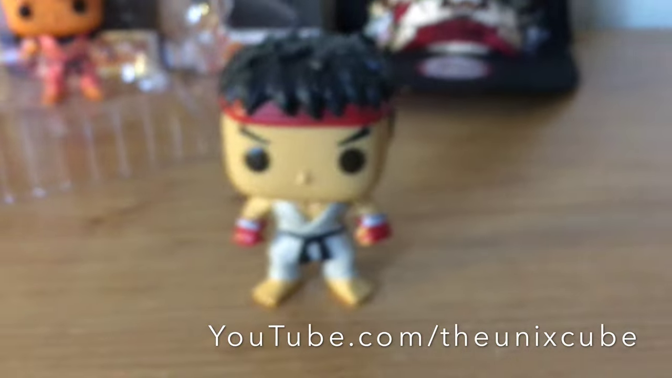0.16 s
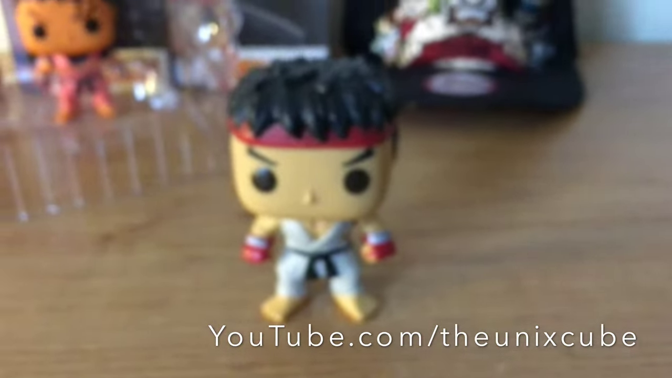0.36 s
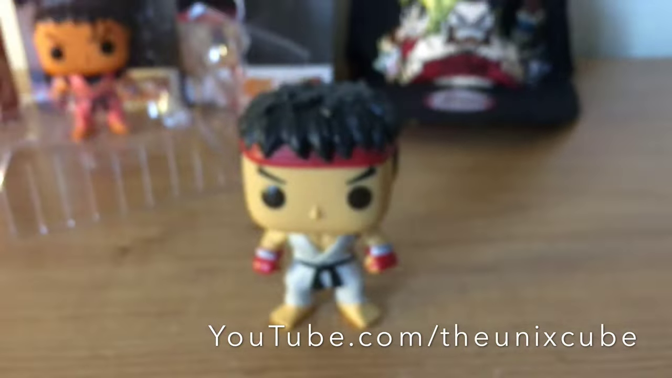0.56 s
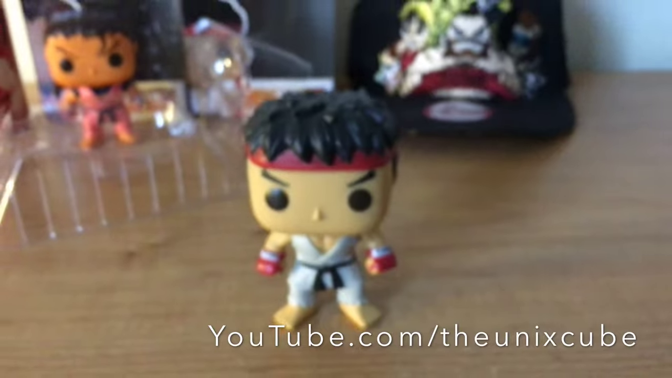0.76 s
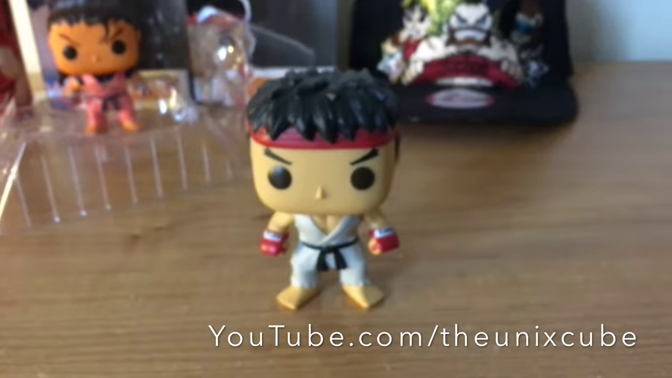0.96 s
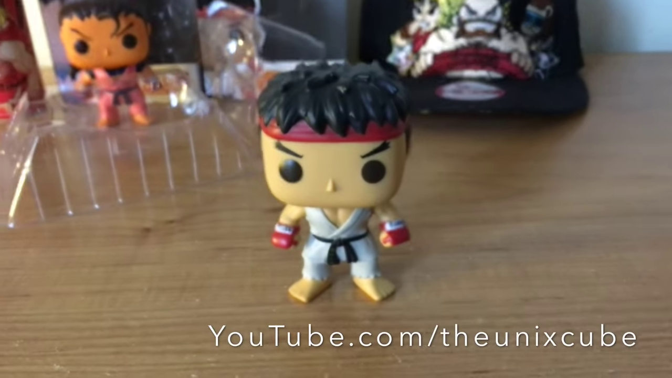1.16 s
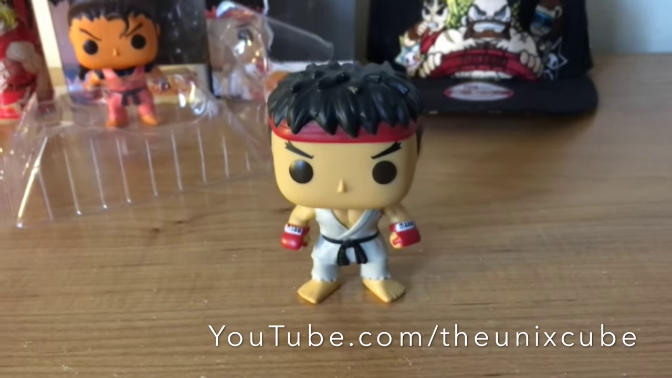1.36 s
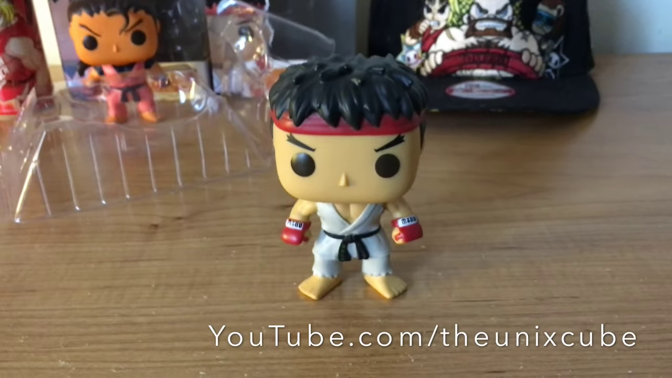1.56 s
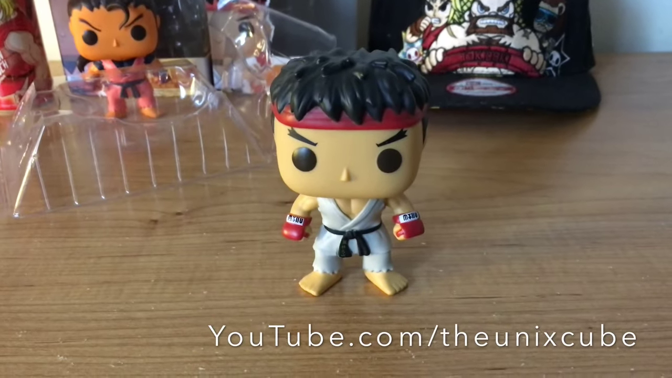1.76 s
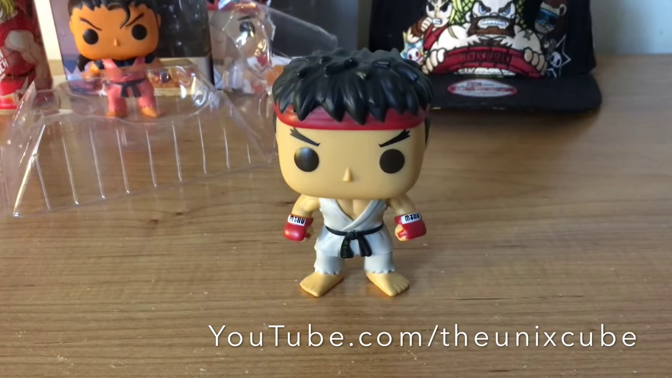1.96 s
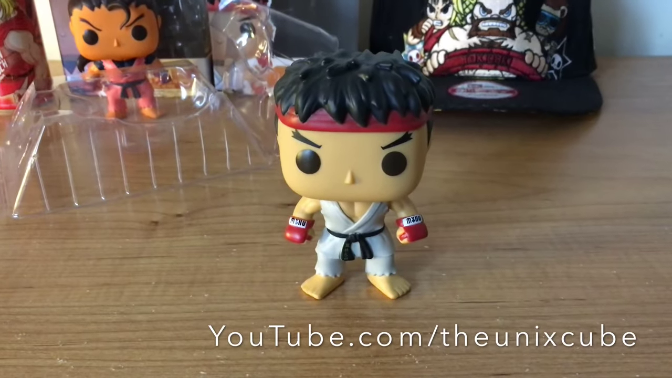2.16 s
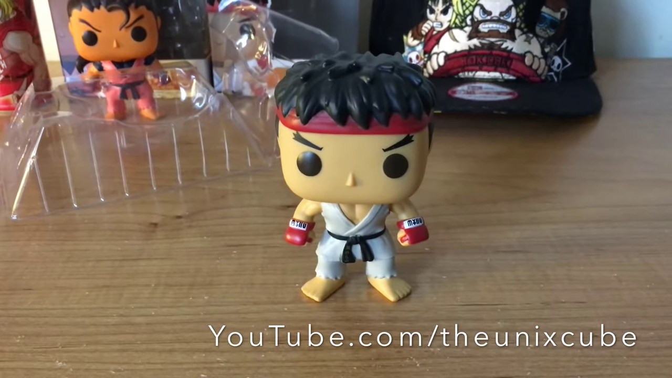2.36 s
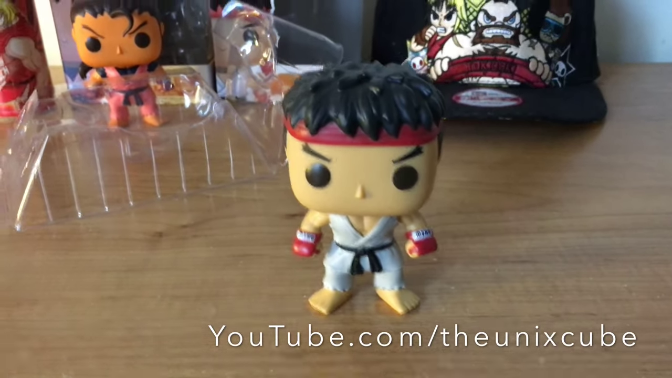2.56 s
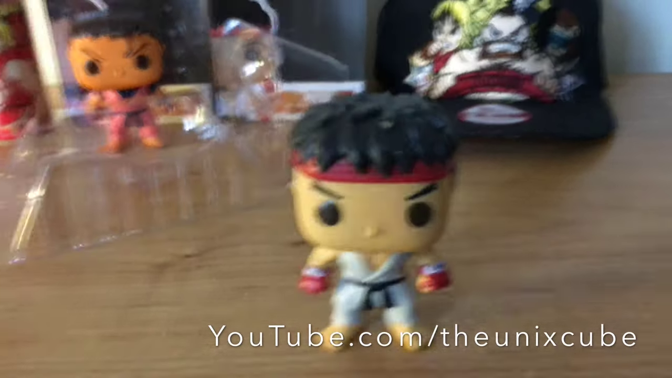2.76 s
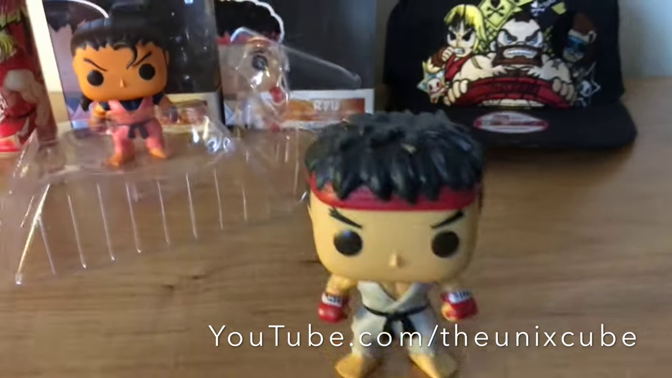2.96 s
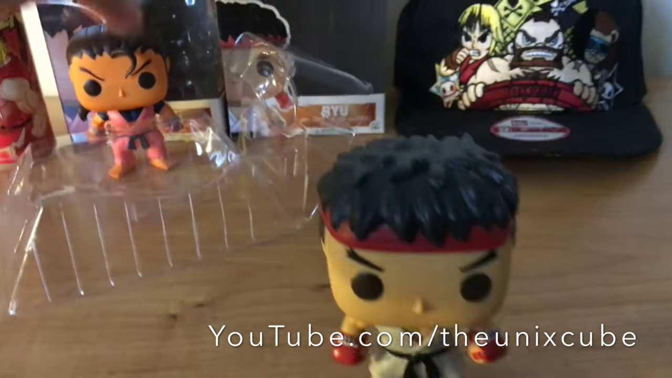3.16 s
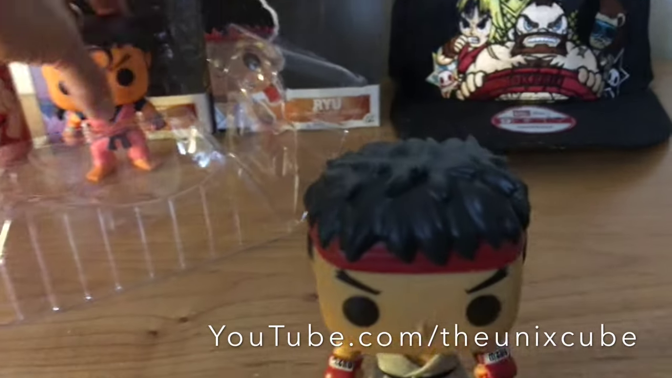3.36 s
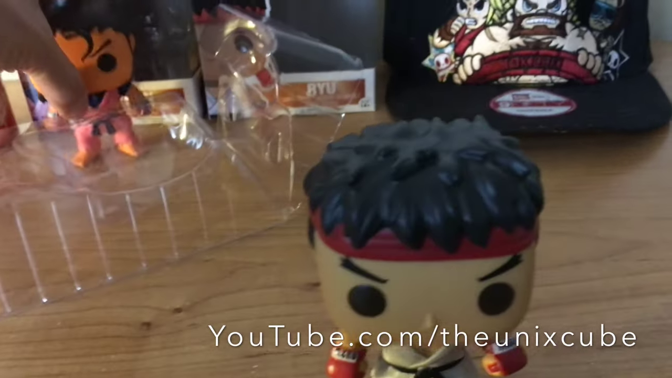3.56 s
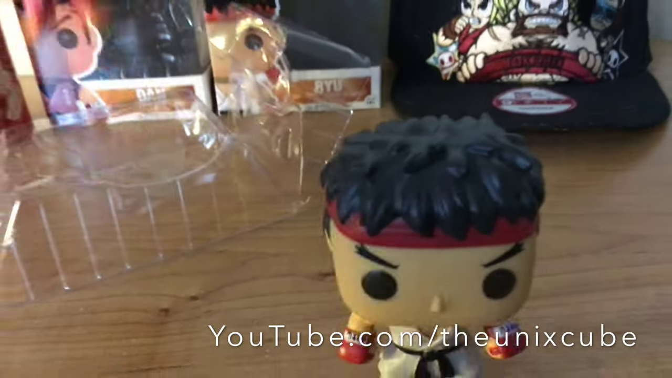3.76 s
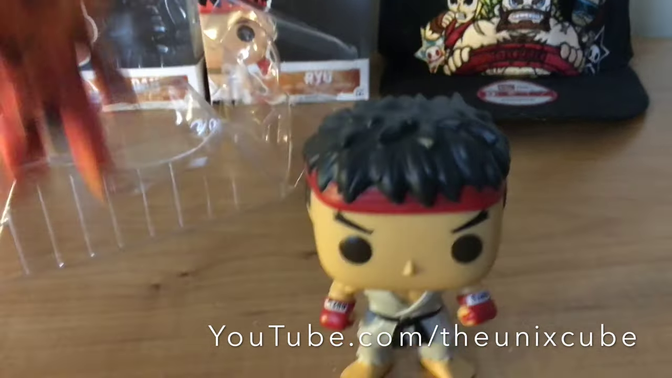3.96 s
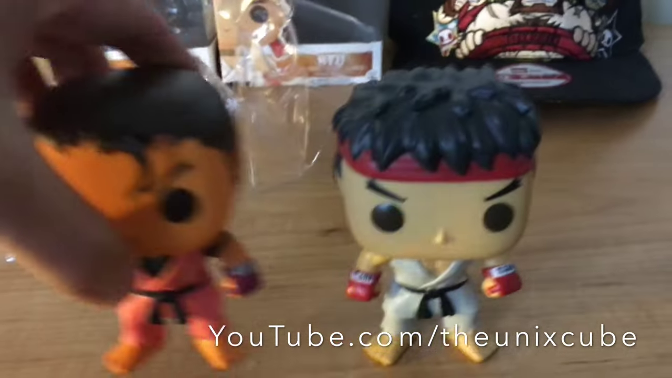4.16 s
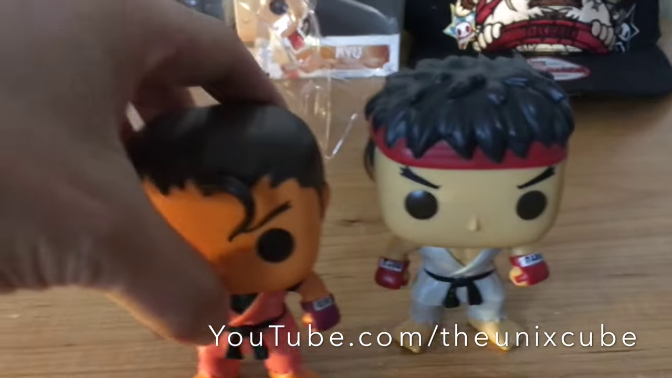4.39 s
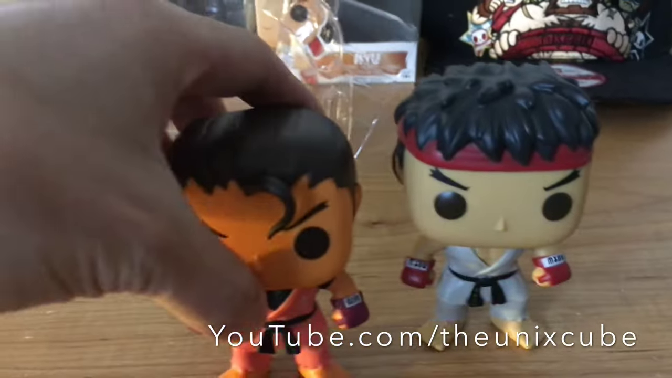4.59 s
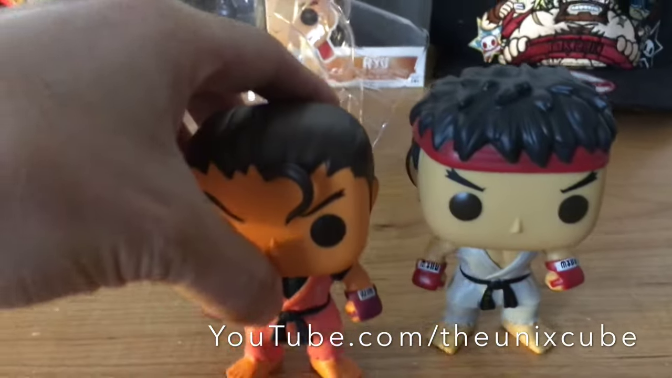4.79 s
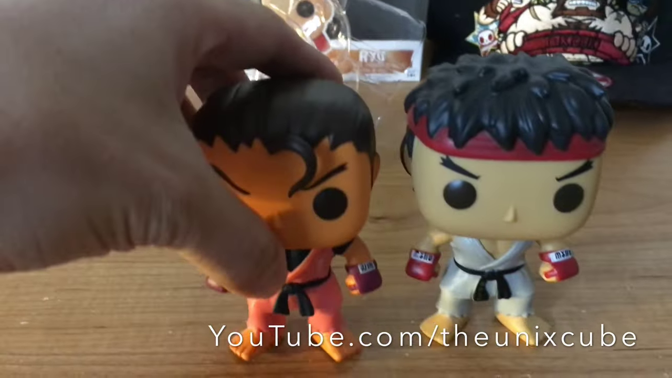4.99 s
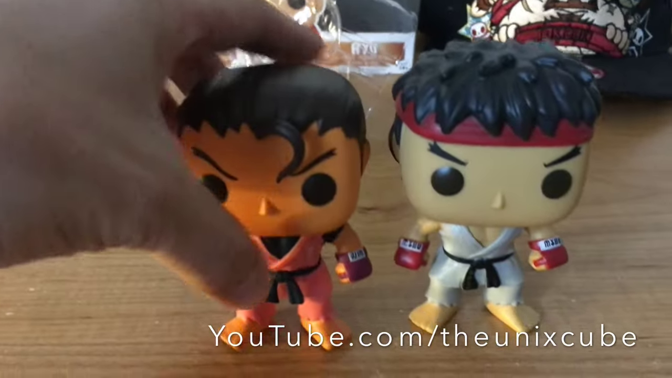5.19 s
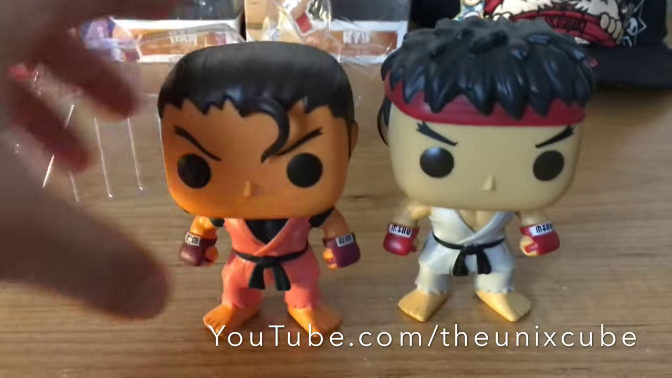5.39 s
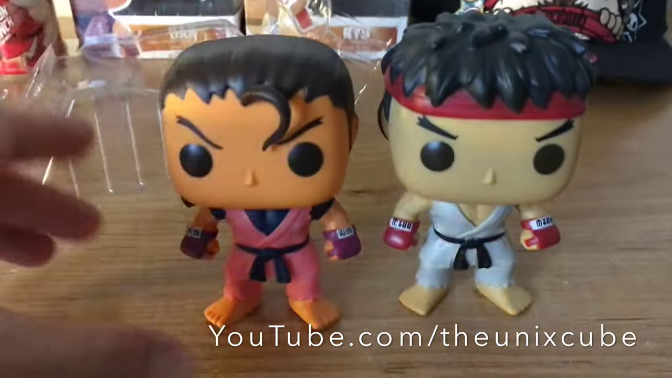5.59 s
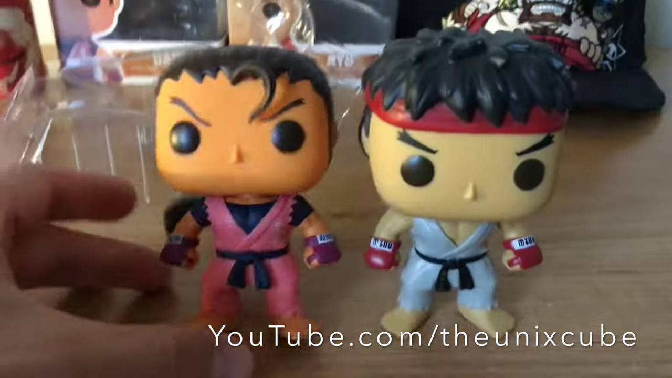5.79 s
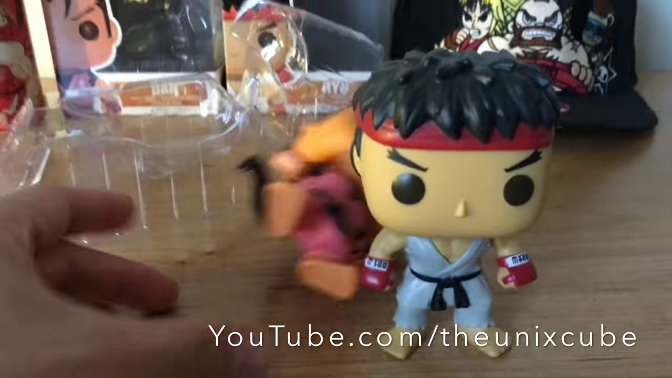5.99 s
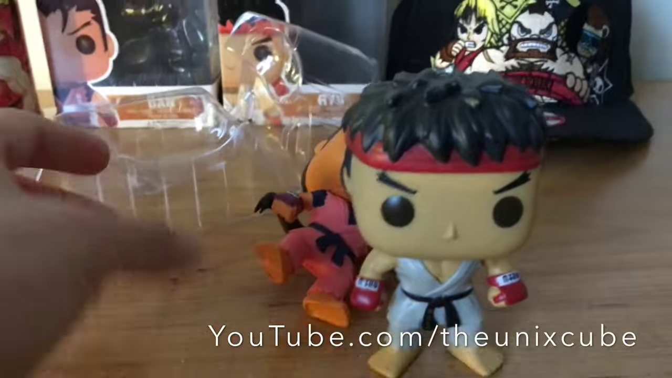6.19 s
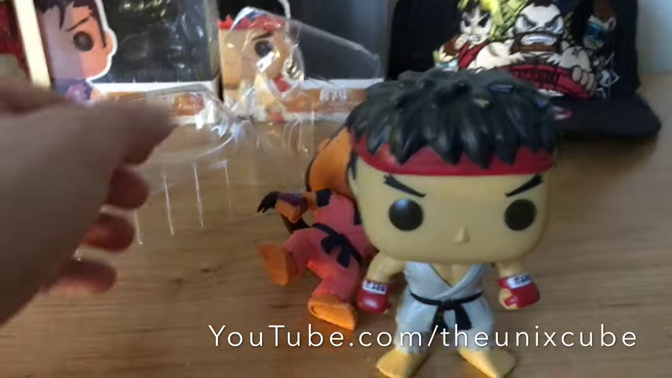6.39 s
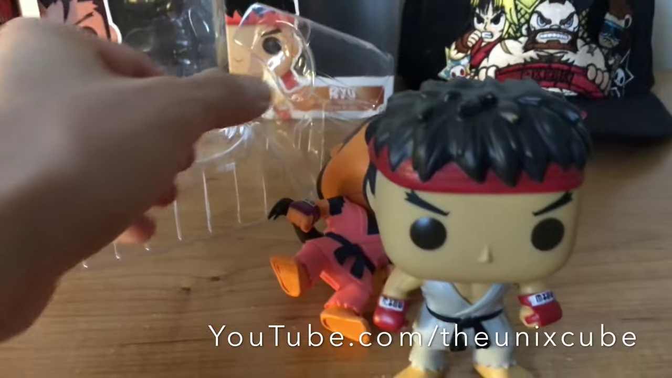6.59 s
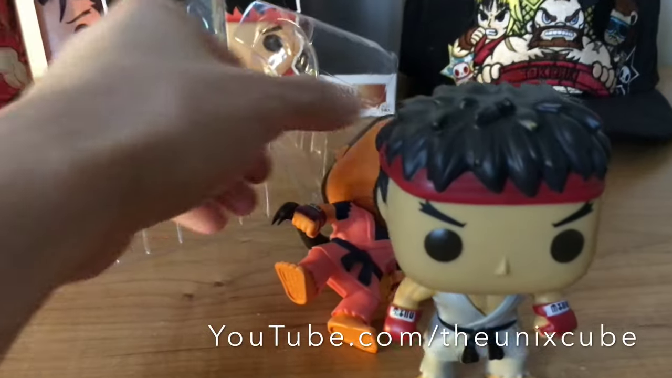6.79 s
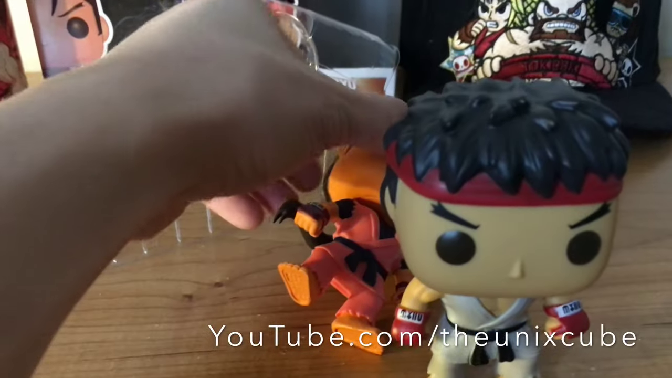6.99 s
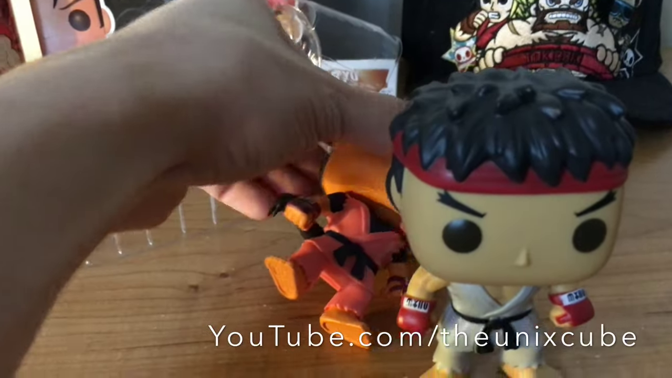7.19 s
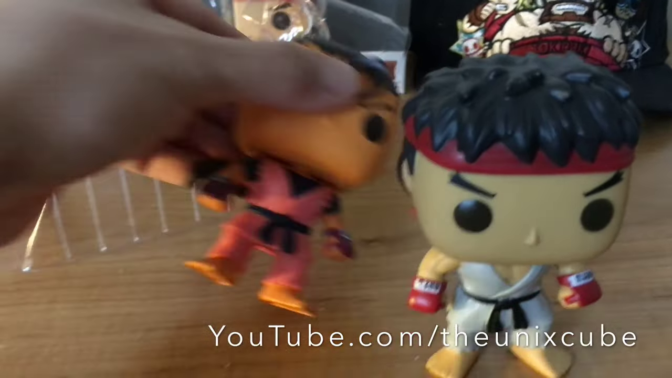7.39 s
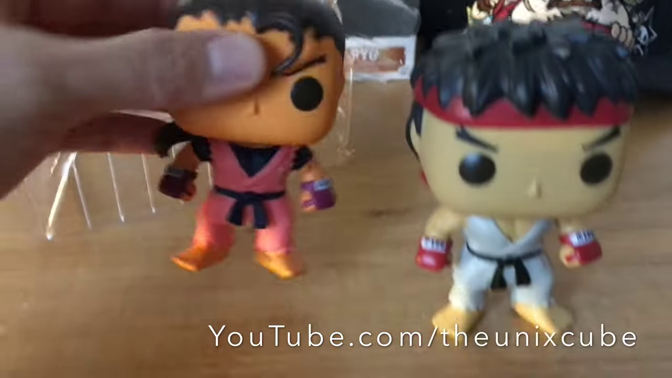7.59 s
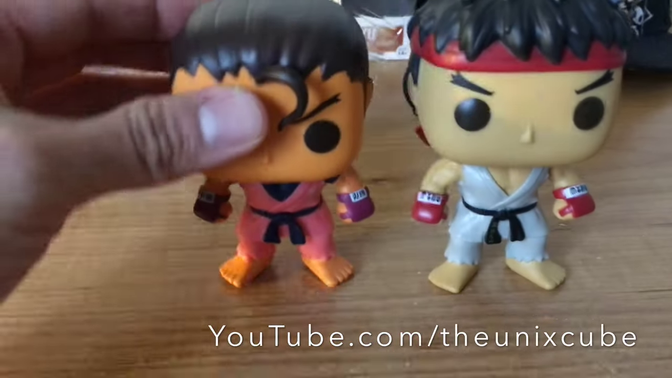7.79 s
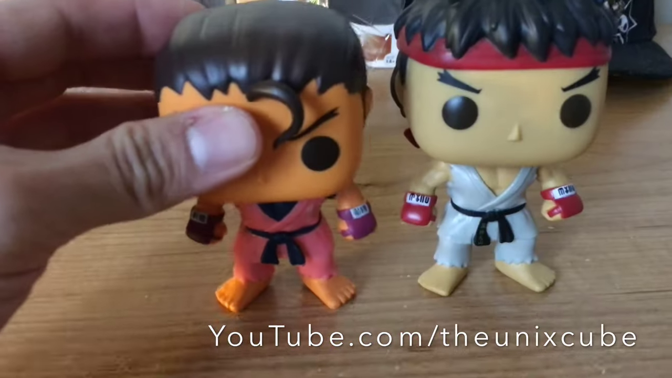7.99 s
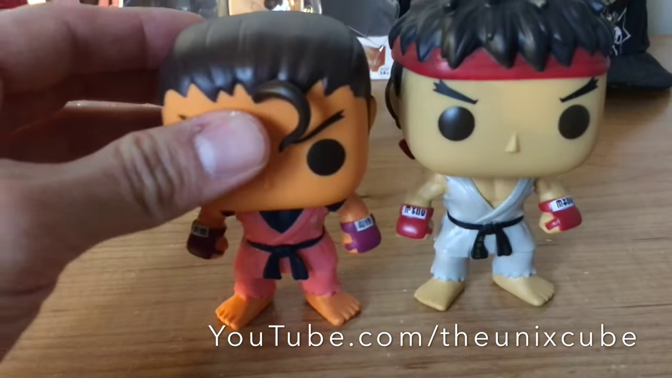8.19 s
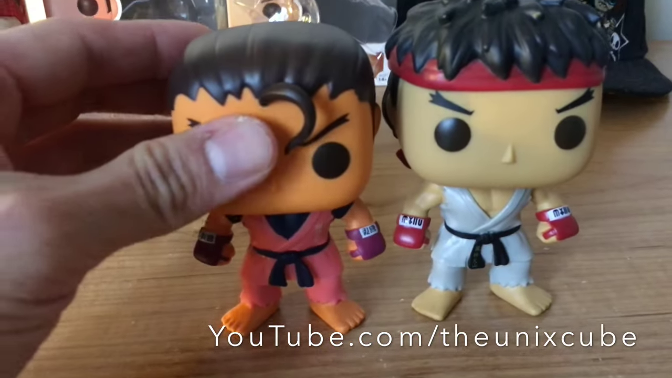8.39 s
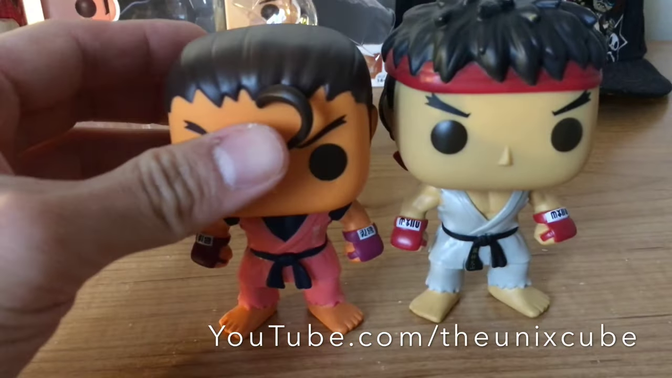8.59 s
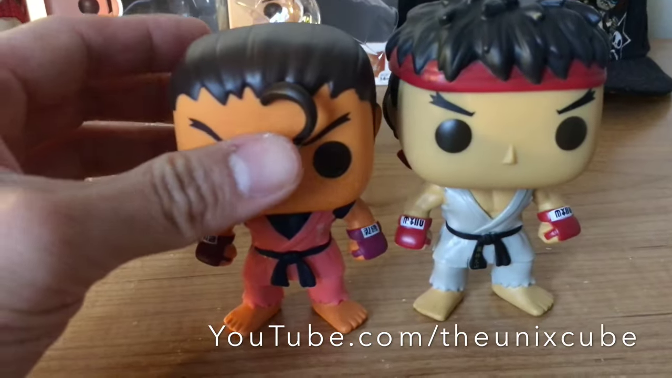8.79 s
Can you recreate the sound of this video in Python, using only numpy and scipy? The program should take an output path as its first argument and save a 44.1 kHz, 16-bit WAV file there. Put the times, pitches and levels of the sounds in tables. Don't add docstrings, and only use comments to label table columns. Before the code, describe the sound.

Quiet room with handling thumps and rattles, light taps, a firm toy set-down, a sharp bouncing topple on wood, then small slides and another knock.

```python
import sys
import numpy as np
from scipy import signal
from scipy.fft import rfft, irfft, next_fast_len
from scipy.io import wavfile
from scipy.ndimage import map_coordinates

SR = 44100
rng = np.random.default_rng(int(sys.argv[2]) if len(sys.argv) > 2 else 0)


def to_linear_factor(level_db):
    exponent = np.asarray(level_db, float) / 20
    return 10 ** exponent


def log_audio(samples):
    frames = np.atleast_2d(samples).T
    limited = np.clip(frames, -1, 1)
    pcm = np.round(limited * 32767).astype(np.int16)
    wavfile.write(sys.argv[1], SR, pcm)


N = 390272

# [f/Hz, level/dB per Hz]
RUMBLE_COLOUR = [(12, -61), (20, -22.5), (41, -6), (59, 1.5), (82, -4), (102, -7.5), (146, -9.5),
                 (260, -27), (340, -43), (570, -120)]
TONE_COLOUR = [(100, -19), (200, 3.5), (400, -2), (900, -10.5), (2500, -17.5), (4000, -32)]
HISS_COLOUR = [(290, -42.5), (500, -37.5), (570, -13.5), (623, -9.5), (753, -7), (810, -10), (898, -4),
               (1450, -10.5), (1730, -9.5), (4170, -11), (4830, -15), (5350, -12), (10500, -16),
               (15100, -15.5), (16500, -32)]
RUMBLE_DB, SWELL_DB, TONE_DB, HISS_DB = -67.5, 0.5, -74, -76
SETTLE_S, SETTLE_DB = 0.8, 7.5

# [t/s, strength/dB, hollow head over torso/dB, hardness/dB, extra snap/dB]
KNOCKS = [
    (.0155, -48, -0.5, 0, -20),
    (3.389, -47.5, 5.5, 7.5, -2),
    (3.415, -68, 5, -2, 4),
    (3.4555, -49.5, 5, 3.5, -3),
    (3.54, -53.5, -1, -4.5, -10),
    (4.4305, -30.5, 2.5, -7.5, -5),
    (4.626, -53, -3, -9, -3),
    (7.836, -33.5, -0.5, -6, 5),
    (8.549, -65, -7, -5, 20),
]
TUMBLE = [(5.942, -37.5, 7.5, 0.5, -5.5), (5.957, -13.5, 3.5, 5, -8.5), (5.981, -29, -7.5, 0, 0),
          (5.9912, -28, -3, 1.5, 0), (5.995, -9, 1, -3, 1.5), (6.0385, -15.5, 3.5, -3.5, 2.5),
          (6.0669, -17, -2, -9, 4.5), (6.084, -28.5, 9.5, -5, 6), (6.1248, -23.5, -10.5, 0.5, 8),
          (6.146, -18.5, -4.5, -14.5, -3), (6.186, -25, -7, -0.5, -0.5), (6.1894, -23, 10, 10, -5),
          (6.207, -30, -6, 0.5, 4), (6.2159, -31.5, 11, 8, -8), (6.237, -19, -2, -8, 2),
          (6.251, -22.5, 0.5, -11, 5)]
# [f/Hz, level/dB, t60/s]
DESK_MODES = [(114.5, -8, 0.13), (151, -3, .25), (213, -9, 0.18), (251, 2, 0.082)]
TORSO_MODES = [(319.5, -0.5, .13), (343, -6, .12), (393.6, -3, 0.12), (423, -8, 0.074), (536, -14, .04)]
HEAD_MODES = [(553, -16.5, .05), (620.5, -3.5, 0.086), (665, -11, .06), (683, -7.5, 0.061), (805, -13, .08),
              (837, -13, 0.076), (951, -7, 0.05), (1100, -19.5, .016)]
SHELL_MODES = [(1340, -3, .035), (1590, 0, .035), (1800, -8, .012), (2430, 1, .018), (2800, -8, .01),
               (3150, -3, .014), (3750, -7, .012)]
FEET_MODES = [(2026, -18, 0.039), (2290, -25, 0.021)]
# [f/Hz, level/dB]
VINYL_COLOUR = [(700, -24.5), (1200, 4.5), (1700, -1.5), (2100, 1), (2500, 0), (3300, -4.5), (4200, -11),
                (5500, -35.5)]
CRACK_COLOUR = [(2000, -15.5), (4000, 4.5), (6000, 1.5), (8000, -6.5), (10000, -14.5), (12000, -8.5),
                (14500, -18.5), (16000, -39)]
DESK_DB, SHELL_DB, CRACK_DB, FEET_DB = -9.5, -0.5, -12.5, -9
FLAT_DB = 6
SQUASH_S = 0.0017

# [f/Hz, t60/s]
ROOM_DECAY = [(150, .5), (600, 0.37), (1400, 0.43), (2500, 0.35), (5000, 0.18), (12000, .18)]

# [t/s, level/dB, f/Hz, t60/s, direction]
JOLTS = [
    (0.101, -49, 62, 0.036, 0.33),
    (0.109, -19.5, 76.5, 0.048, -1.3),
    (2.6143, -19, 334, 0.0035, 0.77),
    (2.6162, -31.5, 66, 0.053, 0.98),
    (2.794, -22.5, 84.4, 0.064, 0.71),
    (2.812, -24, 49.3, 0.061, -0.91),
]
# [t/s, peak level/dB, dull knock over the tick/dB]
STRUCK = [
    (0.1028, -33, 8.5),
    (0.1143, -13.5, -16),
    (2.7878, -33.5, 3.5),
    (2.824, -49, -12),
]
# [peak t/s, rise/s, fall/s, bright level/dB, dull level/dB]
BUZZ = [
    (.111, 0.021, .03, -72, -50),
    (.147, 0.034, 0.022, -57, -59),
    (2.79, 0.0097, 0.036, -74, -49),
    (2.807, 0.018, 0.0024, -41, -41),
]
# [f/Hz, level/dB]
TICK_COLOUR = [(1500, -5), (3000, -0.5), (5000, 0.5), (7000, -8), (9500, 2.5), (11000, -7.5), (13500, -4.5),
               (15300, -14.5), (16800, -29)]
CASE_COLOUR = [(300, 2.5), (700, 13.5), (1300, 12.5), (2000, 9.5), (2600, 8.5), (3150, -29), (3800, -62)]
THROWN_S, THROWN_DB, DULL_DB = 0.1216, -22, -19
FLIGHT_S, SHRINK = 0.0079, 0.82
LOSS_DB, TIRES = 25.5, 0.87

# [peak t/s, rise/s, fall/s, level/dB]
SHUFFLE = [
    (.79, 0.0045, 0.044, -62),
    (.85, 0.083, 0.15, -69.5),
    (2.6, 0.013, 0.035, -69),
]
# [peak t/s, rise/s, fall/s, level/dB]
RUSTLE = [
    (3.39, .006, 0.15, -68.5),
    (3.458, .006, 0.11, -76),
    (6.11, 0.23, 0.21, -63.5),
    (6.72, .025, 0.036, -67),
    (7.07, 0.15, 0.092, -73.5),
    (7.19, .025, 0.15, -72),
    (7.992, .07, 0.071, -76),
    (8.07, .07, 0.065, -78),
]
# [f/Hz, level/dB]
CARD_COLOUR = [(1200, -16.5), (1700, -5.5), (2200, -4.5), (3000, -15), (4000, -18), (7000, -20.5),
               (9000, -28)]
FILM_COLOUR = [(1200, -8), (2000, -9), (4000, 9.5), (5500, 0), (9500, 3.5), (10800, -10), (13000, 4.5),
               (17000, -17)]

# [peak t/s, rise/s, fall/s, pressure/dB, dryness (skin over desk)/dB]
SLIDES = [(1.41, 0.055, 0.15, -61.5, -19), (3.4, 0.0064, 0.058, -46.5, -5), (3.465, 0.0065, 0.036, -59, 4),
          (3.545, .05, 0.053, -52, -8), (4.844, 0.076, 0.059, -53.5, -8.5), (4.915, 0.062, 0.19, -51, -6.5),
          (5.89, 0.042, 0.047, -40.5, -6.5), (6.731, 0.031, 0.03, -56.5, 13), (6.784, .03, .03, -71.5, 9),
          (6.838, .02, 0.022, -74.5, 9), (7.2, 0.031, 0.073, -58.5, -1), (7.256, 0.05, .035, -56.5, -4.5),
          (7.328, .025, 0.033, -66, -3), (7.891, 0.025, 0.1, -55, -8), (7.992, 0.043, .05, -58.5, -8),
          (8.078, 0.069, 0.055, -61, -1.5)]
# [peak t/s, rise/s, fall/s, level/dB]
SINGING = [
    (7.86, .01, 0.057, -70),
    (7.996, 0.062, 0.027, -64),
    (8.07, 0.044, 0.05, -71),
]
# [f/Hz, level/dB]
SKIN_COLOUR = [(600, -28), (950, 8.5), (1300, -2.5), (1700, -8.5), (2000, -21), (2600, -41)]
SOLES_COLOUR = [(1500, -30.5), (1950, 5), (2600, -4.5), (3000, -12.5), (4000, -11.5), (5500, -22.5),
                (7000, -38.5)]
SLIDE_HEAD_DB, HEAD_DRIES, SOLES_DB = -1, 0.6, -11.5
SPAN_DB, ROUND = 20.5, 1.3

# [f/Hz, level/dB]
MIC_BAND = [(100, 0), (16300, 0), (16900, -60)]


def unit(x):
    return x / np.sqrt(np.mean(x ** 2) + 1e-20)


def along(points, hz):
    f, v = np.transpose(points)
    return np.interp(np.log(hz + 1), np.log(f + 1), v)


def wobble(rate):
    knots = rng.standard_normal(int(N * rate / SR) + 4)
    return map_coordinates(knots, [np.arange(N) * rate / SR])


def coloured(x, points):
    m = next_fast_len(len(x) + 8192)
    gain = to_linear_factor(along(points, np.fft.rfftfreq(m, 1 / SR)))
    return irfft(rfft(x, m) * gain, m)[:len(x)]


def ring(modes, scatter_db, rise):
    hz, db, t60 = np.transpose(modes)[:, :, None]
    t = np.arange(SR // 4) / SR
    db = db + scatter_db * rng.standard_normal(db.shape)
    partials = to_linear_factor(db - 60 * t / t60) * np.sin(2 * np.pi * hz * t)
    x = np.sum(partials, axis=0) * (1 - np.exp(-t / rise))
    return x / np.max(np.abs(x))


def burst(points, t60):
    t = np.arange(SR // 20) / SR
    noise = coloured(rng.standard_normal(len(t)), points)
    x = noise * to_linear_factor(-60 * t / t60) * (1 - np.exp(-t / t60 * 30))
    return x / np.max(np.abs(x))


def grit(rate, spread_db):
    hits = rng.random(N) < rate / SR
    return hits * rng.standard_normal(N) * to_linear_factor(spread_db * rng.standard_normal(N))


def strokes(rows):
    t = np.arange(N) / SR
    gains = 0
    for s, rise, fall, *db in rows:
        distance = np.where(t < s, (s - t) / abs(rise), (t - s) / abs(fall))
        gains = gains + to_linear_factor(np.array(db)[:, None] - SPAN_DB * distance ** ROUND)
    return gains


def add(track, s, x):
    part = track[round(s * SR):][:len(x)]
    part += x[:len(part)]


def background():
    def noise(points):
        return unit(coloured(rng.standard_normal(N), points))

    settling_db = SETTLE_DB * np.exp(-np.arange(N) / SR / SETTLE_S)
    rumble_db = RUMBLE_DB - settling_db + SWELL_DB * wobble(1.0) + 1.3 * wobble(5.5)
    rumble = to_linear_factor(rumble_db) * noise(RUMBLE_COLOUR)
    tone = to_linear_factor(TONE_DB + 0.8 * wobble(3.1)) * noise(TONE_COLOUR)
    return rumble + tone + to_linear_factor(HISS_DB) * noise(HISS_COLOUR)


def knocks():
    out = np.zeros((4, N))
    for k, (s, db, head_db, hard_db, snap_db) in enumerate(KNOCKS + TUMBLE):
        track = out[k % 4]
        flat = k < len(KNOCKS)
        bright_db = db + hard_db
        add(track, s, to_linear_factor(db + DESK_DB + flat * FLAT_DB) * ring(DESK_MODES, 1.5, rise=0.0023))
        add(track, s, to_linear_factor(db) * ring(TORSO_MODES, 3.2, SQUASH_S))
        add(track, s, -to_linear_factor(db + head_db) * ring(HEAD_MODES, 3.8, rise=0.0008))
        add(track, s, to_linear_factor(bright_db + SHELL_DB - 6.5) * ring(SHELL_MODES, 4, rise=0.00016))
        add(track, s, to_linear_factor(bright_db + SHELL_DB - 3.5) * burst(VINYL_COLOUR, t60=0.022))
        add(track, s, to_linear_factor(bright_db + snap_db + CRACK_DB) * burst(CRACK_COLOUR, t60=0.0087))
        add(track, s, flat * to_linear_factor(bright_db + FEET_DB) * ring(FEET_MODES, 0.98, rise=0.00057))
    return out


def room(tracks):
    hz, t, z = signal.stft(rng.standard_normal((len(tracks), SR // 2)), SR, nperseg=256)
    decay = to_linear_factor(-60 * t / along(ROOM_DECAY, hz)[:, None])
    tails = signal.istft(z * decay, SR, nperseg=256)[1]
    wet = sum(signal.fftconvolve(x, tail / np.linalg.norm(tail)) for x, tail in zip(tracks, tails))
    return np.pad(wet, (300, 0))[:N]


def phone():
    out = np.zeros(N)
    t = np.arange(SR // 5) / SR
    for s, db, hz, t60, direction in JOLTS:
        swing = np.sin(2 * np.pi * hz * t) * (1 - np.exp(-12 * hz * t))
        add(out, s, direction * to_linear_factor(db - 60 * t / t60) * swing)
    bounces = []
    for k in range(9):
        s = THROWN_S + FLIGHT_S * (1 - SHRINK ** k) / (1 - SHRINK)
        bounces.append((s, THROWN_DB - LOSS_DB * (1 - TIRES ** k), DULL_DB))
    for s, db, dull_db in STRUCK + bounces:
        tick = burst(TICK_COLOUR, t60=0.0027)
        add(out, s, to_linear_factor(db) * (tick + to_linear_factor(dull_db) * burst(CASE_COLOUR, t60=0.011)))
    bright, dull = strokes(BUZZ)
    chatter = grit(rate=15000, spread_db=-2.5)
    buzz = bright * unit(coloured(chatter, TICK_COLOUR)) + dull * unit(coloured(chatter, CASE_COLOUR))
    return out + buzz


def packaging():
    snaps = grit(rate=5000, spread_db=0.5) * to_linear_factor(3.2 * wobble(65))
    film = unit(coloured(snaps, FILM_COLOUR))
    card = unit(coloured(grit(rate=4100, spread_db=-0.5), CARD_COLOUR))
    return strokes(RUSTLE)[0] * film + strokes(SHUFFLE)[0] * card


def slides():
    slips = unit(grit(rate=3200, spread_db=2.5) * to_linear_factor(1.4 * wobble(40)))
    rows = []
    for s, rise, fall, db, dry_db in SLIDES:
        head_db = db + SLIDE_HEAD_DB + HEAD_DRIES * dry_db
        skin_db = db + dry_db
        rows.append((s, rise, fall, db, head_db, skin_db, skin_db + SOLES_DB))
    desk, head, skin, soles = strokes(rows) * slips
    singing = strokes(SINGING)[0] * slips

    def rings(x, modes, share):
        body = ring([(hz, db, share * t60) for hz, db, t60 in modes], 1.5, rise=0.0004)
        return signal.fftconvolve(x, body / np.linalg.norm(body))[:N]

    def grain(x, colour):
        return coloured(x, colour) / np.std(coloured(slips, colour))

    bodies = rings(desk, DESK_MODES[2:] + TORSO_MODES, 0.28) + rings(head, HEAD_MODES, 0.2)
    dry_grain = grain(skin, SKIN_COLOUR) + grain(soles, SOLES_COLOUR)
    return bodies + rings(singing, FEET_MODES, 1.0) + dry_grain


def scene():
    def low_cut(x, cut_hz):
        return signal.sosfilt(signal.butter(2, cut_hz / SR * 2, "high", output="sos"), x)

    desk = np.vstack([knocks(), slides() + packaging()])
    near = desk.sum(axis=0) + to_linear_factor(-15.0) * room(desk)
    return (low_cut(near, cut_hz=83) + low_cut(phone(), cut_hz=61) + background())[None]


def top_cut(x):
    return signal.sosfilt(signal.butter(12, 16840, fs=SR, output="sos"), x)


def record(dry):
    mix = coloured(dry[0], MIC_BAND)[None]
    return top_cut(mix)


dry = scene()
out = record(dry)
log_audio(out)
```